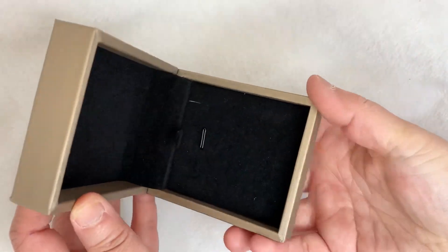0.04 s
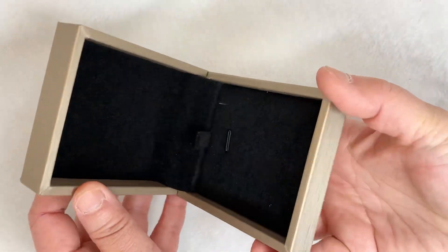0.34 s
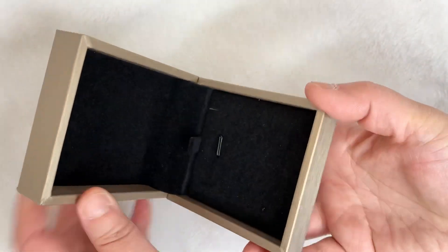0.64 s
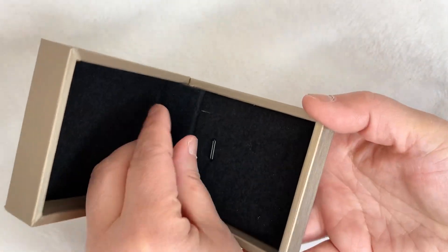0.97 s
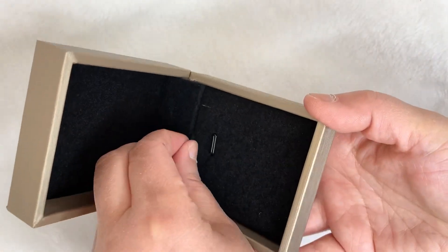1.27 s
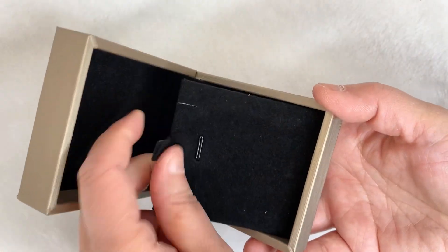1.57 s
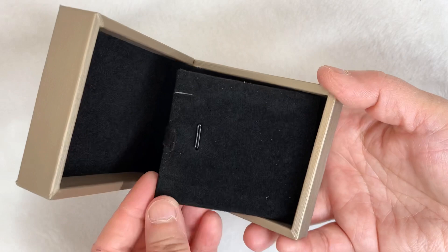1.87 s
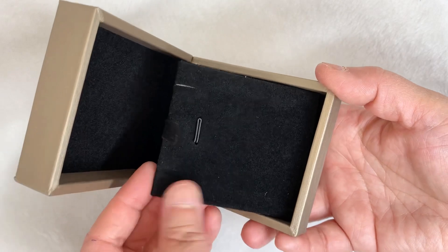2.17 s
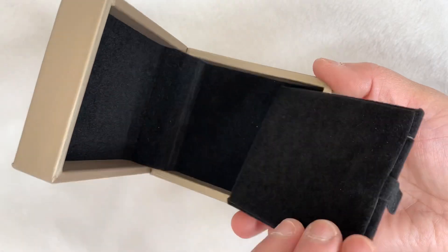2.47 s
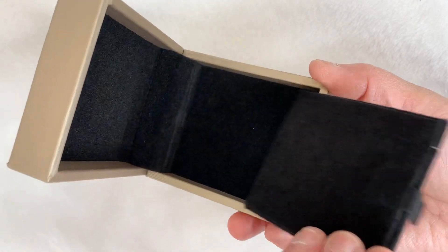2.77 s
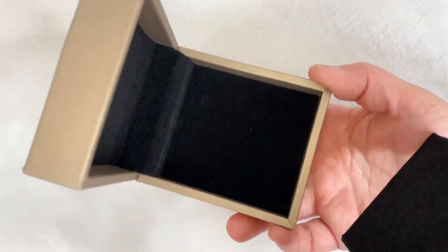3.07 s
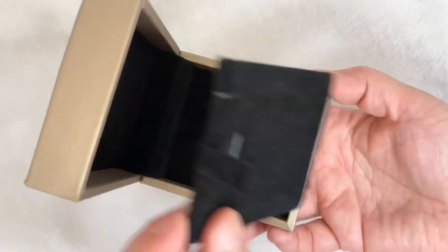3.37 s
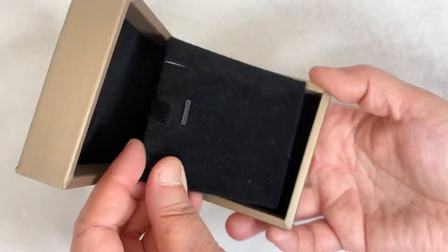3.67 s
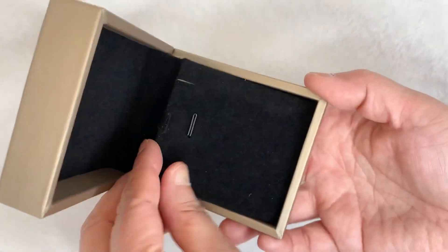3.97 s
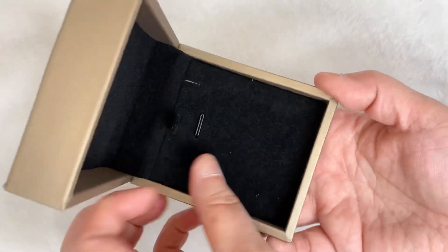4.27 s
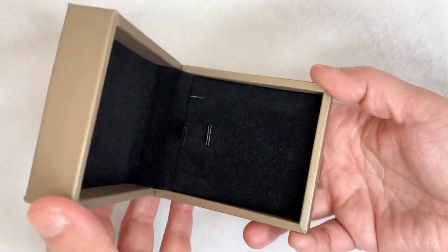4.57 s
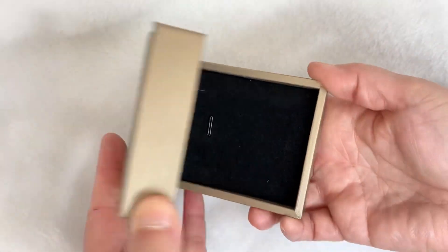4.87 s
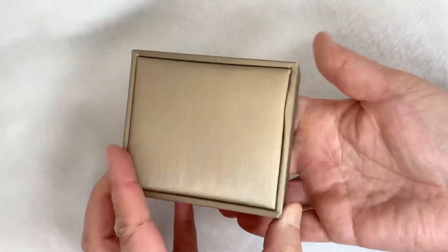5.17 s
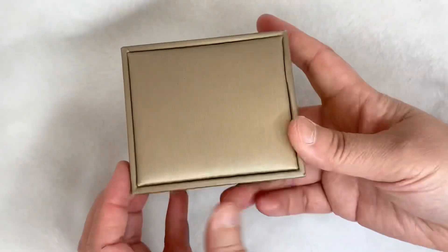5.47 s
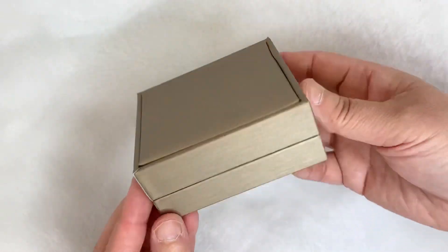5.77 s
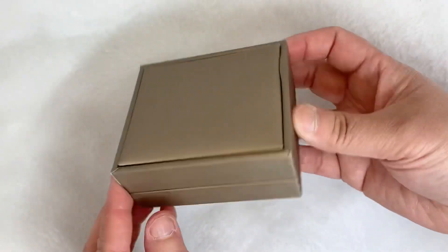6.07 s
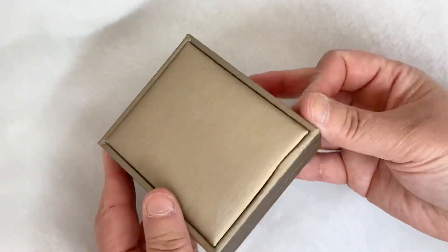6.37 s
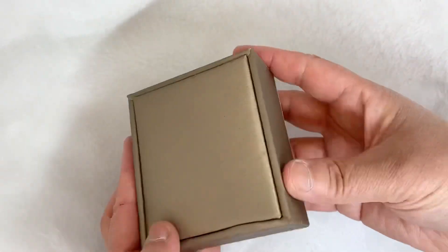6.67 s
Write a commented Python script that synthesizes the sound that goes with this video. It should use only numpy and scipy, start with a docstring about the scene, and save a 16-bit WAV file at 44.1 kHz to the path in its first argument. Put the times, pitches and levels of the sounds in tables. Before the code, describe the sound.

Fingers pinch a velvet pad and slide it out of a faux-leather jewelry box, then push it back, with faint scrapes, hiss and a few light hollow bumps. The lid snaps shut with one loud, hollow clap. Fingers then squeak and rub softly on the closed box. It is all close to the microphone, in a quiet room with a low ventilation rumble.

```python
"""A faux-leather jewelry box, handled close to a stereo pair in a quiet room with a low ventilation rumble.
First fingers pinch the velvet pad; it slides out and is pushed back, scraping and hissing along the
lining and bumping the hollow shell. About five seconds in, after a very brief swell of noise, the lid
snaps shut with one hollow clap. Last, fingers turn the closed box, squeaking and rubbing on it."""
import sys
import numpy as np
from scipy import signal
from scipy.fft import rfft, irfft, next_fast_len
from scipy.io import wavfile
from scipy.ndimage import uniform_filter1d, map_coordinates

SR = 44100
rng = np.random.default_rng(int(sys.argv[2]) if len(sys.argv) > 2 else 0)


def wrap_up_sound(samples):
    """Save the sound to the file named by the first command line argument, as 16-bit audio."""
    columns = np.atleast_2d(samples).T
    # keep every value between -1 and 1, then stretch to whole-number steps
    tamed = np.clip(columns, -1, 1)
    steps = np.round(tamed * 32767).astype(np.int16)
    wavfile.write(sys.argv[1], SR, steps)


N = 305373
TIME = np.arange(N) / SR
SHUT_S = 5.1107  # the lid lands

# The colour of leather, rubbed or struck. Each row: frequency in Hz, gain in dB.
LEATHER_COLOUR = [(1200, -16), (1900, -10.5), (2500, 0.5), (3100, 1), (3800, 1.5), (4400, -3), (5800, -1.5),
                  (7500, -11), (10500, -15.5)]


def amp(db):
    """Decibels to gain."""
    return 10 ** (np.asarray(db) / 20)


def unit(x):
    """Scale to rms 1."""
    return x / np.sqrt(np.mean(x ** 2) + 1e-20)


def along(points, hz):
    """Read a curve of (Hz, value) points on a log frequency axis."""
    freqs, values = np.transpose(points)
    return np.interp(np.log(hz + 1), np.log(freqs + 1), values)


def wobble(rate):
    """A smooth random curve, rate knots a second."""
    return map_coordinates(rng.standard_normal(int(N * rate / SR) + 4), [TIME * rate])


def filtered(x, response):
    """Filter x by a response given as a function of Hz."""
    size = 2 * next_fast_len(N // 2 + SR // 4)
    return irfft(rfft(x, size) * response(np.fft.rfftfreq(size, 1 / SR)), size)[..., :N]


def causal(db):
    """The minimum-phase response with this gain: it rings only after it is struck."""
    cepstrum = irfft(np.log(amp(db)))
    half = cepstrum.shape[-1] // 2
    return np.exp(rfft(cepstrum * np.r_[1, np.full(half - 1, 2), 1, np.zeros(half - 1)]))


def mics(left_minus_right):
    """Share a level or delay between the microphones: plus half left, minus half right."""
    return np.array([[.5], [-.5]]) * left_minus_right


def diffuse(pair):
    """Two unrelated signals become a room field: alike in the bass, nearly unrelated in the treble."""
    # Each row: frequency in Hz, correlation between the microphones.
    likeness = [(60, 0.98), (130, 0.94), (290, 0.98), (640, 0.46), (1410, 0.077), (3100, -0.0062),
                (6820, 0.075), (15000, 0.27)]
    alike = lambda hz: along(likeness, hz)
    mid, side = filtered(pair, lambda hz: np.sqrt([(1 + alike(hz)) / 2, (1 - alike(hz)) / 2]))
    return np.array([mid + side, mid - side])


def ventilation(level_db):
    """A steady rumble behind everything, coloured by the room's resonances."""
    # The moving air. Each row: frequency in Hz, gain in dB.
    colour = [(13, -63.5), (22, -30.5), (37, -25), (45, -14), (59, -3), (97, -3), (241, -5), (335, -9),
              (467, -18.5), (667, -26.5), (787, -25), (1100, -35.5), (1570, -33), (2720, -45.5),
              (5000, -55.5), (11000, -60.5), (14500, -57.5), (15800, -62.5)]
    # Room resonances and dips. Each row: centre in Hz, width in Hz, gain in dB.
    modes = [(57, 7, -7.5), (71.2, 12, 5.5), (91, 11, -5.5), (107, 7, 1), (169.9, 10, 7), (191.4, 24, -4.5),
             (206.5, 8, 5), (224.4, 10, -6.5), (238.3, 9.1, 5), (285, 21, 1), (286, 90, 2), (294, 6.5, 3),
             (405, 30, -2), (473, 45, 4.5), (600, 120, -0.5), (775, 110, 6.5), (1041, 38, 7),
             (1109, 50, -8), (1147, 35, 9.5), (1440, 30, -6), (1975, 70, 6)]
    # Each row: frequency in Hz, left over right in dB.
    balance = [(60, -3), (110, 0.5), (200, -4.5), (380, -3), (700, 0), (1290, -3.5), (2380, 1), (4400, 1),
               (8120, 0), (15000, -1.5)]
    booms = lambda hz: sum(db / (1 + (2 * (hz - centre) / width) ** 2) for centre, width, db in modes)
    field = diffuse(rng.standard_normal((2, N)))
    air = filtered(field, lambda hz: amp(along(colour, hz) + booms(hz) + mics(along(balance, hz))))
    return amp(level_db + 0.21 * wobble(12.0)) * unit(air)


def room(x, build_up_s):
    """The room's short answer, faint this close to the box; each frequency dies at its own speed."""
    # Each row: frequency in Hz, seconds to fall 60 dB.
    decay_times = [(150, 0.34), (500, .3), (1500, 0.15), (4000, 0.075), (12000, .15)]
    # The reverberation's colour. Each row: frequency in Hz, gain in dB.
    colour = [(100, -29), (450, -18), (900, -30.5), (1700, -13), (4000, -17), (12000, -16.5)]
    hz, t, noise = signal.stft(rng.standard_normal((2, SR // 2)), SR, nperseg=256)
    decay = amp(-60 * t / along(decay_times, hz)[:, None]) * (1 - np.exp(-t / build_up_s))
    decay /= np.sqrt(np.mean(decay ** 2, axis=1, keepdims=True) * (SR // 2))
    tail = signal.istft(noise * decay * amp(along(colour, hz))[:, None], SR, nperseg=256)[1]
    return diffuse(signal.fftconvolve(x.mean(axis=0)[None], tail, axes=1)[:, :N])


def friction(colour, grain_db, side_db, patchy_db):
    """Dense uneven slips, near rms 1; their fine resonances shift as the contact moves."""
    slips = rng.standard_normal((2, N)) * amp(grain_db * wobble(900))
    spectra = signal.stft(slips, nperseg=512)[2]
    patches = uniform_filter1d(rng.standard_normal(spectra.shape[1:]), size=3, axis=0)
    patches = unit(uniform_filter1d(patches, size=18, axis=1))
    slips = signal.istft(spectra * amp(patchy_db * patches), nperseg=512)[1][:, :N]
    return unit(filtered(slips, lambda hz: amp(along(colour, hz)))) * amp(mics(side_db))


def strokes(rows, attack_s, release_s, sag_db_per_s):
    """An envelope for each of two level columns; a stroke eases in, slows a little and coasts to a stop."""
    power = np.zeros((2, N))
    for start, length, *levels in rows:
        t = TIME - start
        rise = .5 + .5 * np.tanh(.5 * t / attack_s)
        hold = amp(-sag_db_per_s * np.clip(t, 0, length))
        fall = np.exp(-np.clip((t - length) / release_s, 0, 20))
        power += (amp(levels)[:, None] * (rise * hold * fall)) ** 2
    return np.sqrt(power)


def swell(peak_s, rise_s, fall_ratio):
    """The bell-shaped envelope of one push, falling more slowly than it rises."""
    fall_s = fall_ratio * rise_s
    near = slice(round((peak_s - 5 * rise_s) * SR), round((peak_s + 5 * fall_s) * SR))
    t, gain = TIME[near] - peak_s, np.zeros(N)
    gain[near] = np.exp(-.5 * (t / np.where(t < 0, rise_s, fall_s)) ** 2)
    return gain


def ring(start_s, db, hz, t60):
    """One damped mode, struck through a thin leather skin."""
    t = np.arange(SR // 4) / SR
    tone = amp(db - 60 * t / t60) * np.sin(2 * np.pi * hz * t)
    onset = 1 - np.exp(-t / 0.000091)
    start = round(start_s * SR)
    return np.pad(tone * onset, (start, N - start - len(t)))


def squeaks():
    """A fingertip gripping the shut lid sticks and slips in a narrow band."""
    # Each row: peak time in seconds, rise in seconds, level in dB.
    slips = [(5.225, .022, -67.5), (5.375, .012, -71), (5.495, 0.0039, -75), (5.553, 0.013, -61.5),
             (5.69, 0.016, -74)]
    # Each row: frequency in Hz, gain in dB.
    colour = [(2800, -13.5), (3450, -6.5), (3750, -2), (4100, -5), (4800, -14), (6200, -15.5), (8000, -27)]
    gain = sum(amp(db) * swell(peak, rise, fall_ratio=3.4) for peak, rise, db in slips)
    return gain * friction(colour, grain_db=3.0, side_db=0.5, patchy_db=6.0)


def fingers():
    """Skin slides on the pad's tab and the leather shell; gives the rub and its hiss envelope."""
    # Each row: start and length in seconds, relative rub and hiss levels in dB.
    slides = [(1.035, 0.13, -58.5, -63), (1.18, .075, -61.5, -60.5), (2.96, .3, -84, -91),
              (4.62, 0.02, -69, -63), (4.71, .29, -82, -100), (5.015, .075, -68.5, -81),
              (5.37, 0.075, -76.5, -80), (5.68, 0.16, -83, -85), (6.12, 0.039, -76, -81),
              (6.295, 0.14, -78, -78), (6.53, .08, -71.5, -86), (6.605, .055, -70, -56.5),
              (6.67, 0.092, -67, -71), (6.77, 0.096, -73.5, -74.5)]
    rub, hiss = strokes(slides, attack_s=.008, release_s=0.028, sag_db_per_s=15)
    grip = amp(-90 + 4.5 * wobble(7.8))  # the holding hand never rests
    leather = friction(LEATHER_COLOUR, grain_db=0.6, side_db=-1.0, patchy_db=2.5)
    return amp(4.0) * np.hypot(rub, grip) * leather, hiss


def scuffs():
    """Quick glancing contacts; gives the rasp and its hiss envelope."""
    # Each row: peak time and rise in seconds, rasp and hiss levels in dB.
    touches = [(.597, .009, -74, -77), (0.996, 0.0072, -59.5, -66), (1.033, 0.0075, -55.5, -62),
               (1.329, .015, -49.5, -50), (1.421, 0.011, -59.5, -62), (1.462, 0.0091, -52, -54),
               (1.639, 0.0023, -53, -59), (3.775, .013, -69.5, -90), (3.856, 0.011, -58.5, -60),
               (4.1422, 0.0034, -41.5, -40.5), (4.482, 0.0028, -67.5, -74), (4.548, 0.011, -65, -62),
               (5.165, 0.019, -58.5, -67), (5.577, 0.011, -79, -64), (5.838, .006, -77, -75),
               (6.425, 0.0084, -68, -63)]
    # Each row: frequency in Hz, gain in dB.
    colour = [(700, -10), (1100, -7.5), (1700, -8), (2500, 2.5), (3500, -2.5), (4600, -5.5), (6200, -4),
              (8000, -14), (11000, -20.5)]
    rasp, hiss = sum(amp(levels)[:, None] * swell(peak, rise, fall_ratio=1.15)
                     for peak, rise, *levels in touches)
    return rasp * friction(colour, grain_db=2.5, side_db=-1.5, patchy_db=1.5), hiss


def pad():
    """The velvet pad drags along the lining; gives its edge's scrape and its nap's hiss envelope."""
    # Each row: start and length in seconds, relative scrape and hiss levels in dB.
    pushes = [(1.495, 0.052, -66, -63.5), (1.585, 0.049, -62, -52.5), (1.665, 0.091, -68.5, -59),
              (1.775, 0.043, -67, -52.5), (2.152, 0.052, -69, -57.5), (2.24, 0.051, -72, -58),
              (2.82, 0.052, -71, -59.5), (3.335, .1, -84.5, -74), (3.545, 0.049, -67.5, -64),
              (3.66, 0.044, -67.5, -62), (3.843, .1, -64, -63), (4.005, 0.077, -59.5, -48.5),
              (4.115, 0.034, -55, -53), (4.17, 0.054, -65, -63), (4.215, 0.025, -66, -54)]
    # The pad's edge. Each row: frequency in Hz, gain in dB.
    colour = [(900, -5), (1700, -11), (2400, 3.5), (3000, 2.5), (3700, -1), (4500, -10), (5900, -5),
              (8000, -15), (11000, -24)]
    scrape, hiss = strokes(pushes, attack_s=0.01, release_s=0.028, sag_db_per_s=21)
    return amp(3.5) * scrape * friction(colour, grain_db=-1.0, side_db=-2.0, patchy_db=2.5), hiss


def rubbing():
    """Fingers, scuffs and pad, a little right of centre; every contact also hisses."""
    # The high hiss of nap and skin. Each row: frequency in Hz, gain in dB.
    hiss_colour = [(6000, -26), (8500, -17.5), (10500, -6), (12200, -1.5), (13800, -1), (15500, -6),
                   (17000, -10)]
    rub, skin_hiss = fingers()
    catch = amp(1.5 * wobble(60))  # long strokes catch and ease
    scrape, nap_hiss = pad()
    rasp, scuff_hiss = scuffs()
    hiss_gain = amp(.4) * catch * (nap_hiss + skin_hiss) + scuff_hiss
    hiss = hiss_gain * friction(hiss_colour, grain_db=1.5, side_db=-1.0, patchy_db=5.5)
    return catch * (scrape + rub) + rasp + hiss


def bumps():
    """The pad bumps the hollow shell; each soft contact wakes only one low mode."""
    # Each row: start in seconds, level in dB, pitch in Hz, seconds to fall 60 dB.
    knocks = [(1.331, -46.5, 955, 0.018), (1.638, -39, 814, 0.018), (4.146, -36, 460, 0.031)]
    return sum(ring(*row) for row in knocks)


def lead_in(peak_db, growth_db_per_s):
    """A brief rush of noise swells steeply just before the snap and stops as it hits."""
    # Each row: frequency in Hz, gain in dB.
    colour = [(200, -13), (660, 2.5), (1200, -15), (2200, -13.5), (3400, -6.5), (4700, -19), (7000, -36.5),
              (15000, -28)]
    time_left = np.minimum(np.abs(SHUT_S - TIME), .5)
    gain = amp(peak_db - growth_db_per_s * time_left) * (TIME < SHUT_S)
    return gain * friction(colour, grain_db=3, side_db=-2, patchy_db=3)


def off_centre(x):
    """The right microphone is nearer the snap: it hears it earlier and, below the top treble, louder."""
    # Each row: frequency in Hz, left over right in dB.
    balance = [(100, -4), (450, -1.5), (600, -2.5), (900, -10.5), (1700, -1.5), (3500, -3.5), (5500, -4),
               (9000, 1)]
    # Each row: frequency in Hz, the left microphone's lag in seconds.
    left_lag = [(300, 0.000078), (1000, 0.00019), (2000, .00024), (4500, .00022)]
    delay = lambda hz: np.exp(-2j * np.pi * hz * mics(along(left_lag, hz)))
    return filtered(x, lambda hz: causal(mics(along(balance, hz))) * delay(hz))


def snap(clap_db, walls_db, crack_db, crack_t60, lag_s, turn_hz):
    """The rim cracks and rings the walls; the blow spreads through the shell as a hollow clap."""
    # The box's ringing modes. Each row: pitch in Hz, relative level in dB, seconds to fall 60 dB.
    modes = [(478, -28, .14), (600, -27.5, .1), (1123, -27.5, 0.015), (1417, -24, 0.0072),
             (1736, -10.5, 0.008), (2140, -19.5, 0.013), (2580, -13, 0.0075), (3050, -11, .0075),
             (3680, -10, 0.006), (4125, -13, 0.0027), (5543, -15.5, 0.0034), (10790, -35, 0.0044),
             (13500, -26.5, .003)]
    # The hollow shell's response. Each row: frequency in Hz, gain in dB.
    shell = [(20, -44), (55, -39.5), (110, -18), (250, -7.5), (420, 0), (600, -0.6), (800, -6), (1000, -13),
             (1300, -34.5), (4000, -65)]
    walls = amp(walls_db) * sum(ring(SHUT_S, db, hz, t60) for hz, db, t60 in modes)
    # the leather rims meet at many points within a millisecond
    fall_db = np.minimum(60 * np.abs(TIME - SHUT_S) / crack_t60, 200)
    contacts = amp(crack_db - fall_db) * (TIME > SHUT_S) * rng.standard_normal((2, N))
    crack = filtered(contacts, lambda hz: amp(along(LEATHER_COLOUR, hz)))
    blow = np.zeros(N)
    blow[round(SHUT_S * SR)] = amp(clap_db)
    # slow bending waves: tones below turn_hz arrive up to lag_s after the crack
    spread = lambda hz: np.exp(-2j * np.pi * lag_s * turn_hz * np.arctan(hz / turn_hz))
    clap = filtered(blow, lambda hz: causal(along(shell, hz)) * spread(hz))
    return off_centre(clap + crack + walls)


def scene():
    """The box close up, the room around it and the rumble behind."""
    rush = lead_in(peak_db=-25.5, growth_db_per_s=850.0)
    shut = snap(clap_db=36.5, walls_db=1.8, crack_db=-12, crack_t60=.005, lag_s=0.00359, turn_hz=468)
    box = rubbing() + squeaks() + bumps() + rush + shut
    return box + room(box, build_up_s=0.0037) + ventilation(level_db=-45.5)


def record(dry):
    """The recorder rounds off peaks near full scale and cuts steeply above its band limit."""
    ceiling, top_hz = .93, 15850
    rounded = dry / (1 + (dry / ceiling) ** 6) ** (1 / 6)
    return filtered(rounded, lambda hz: causal(np.clip((top_hz - hz) / 10, -70, 0)))


dry = scene()
out = record(dry)
wrap_up_sound(out)
```